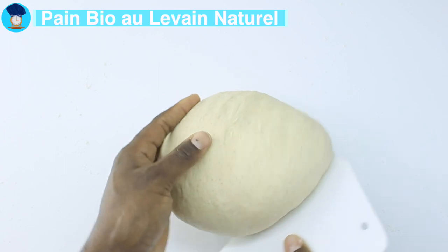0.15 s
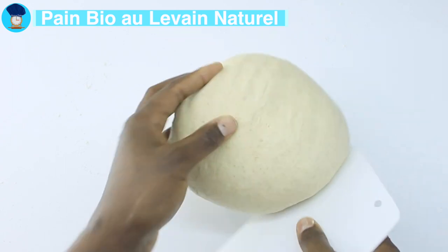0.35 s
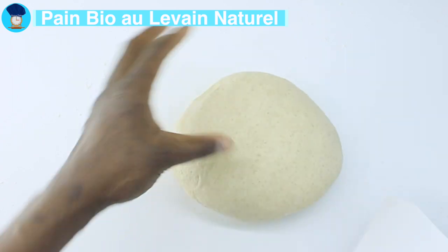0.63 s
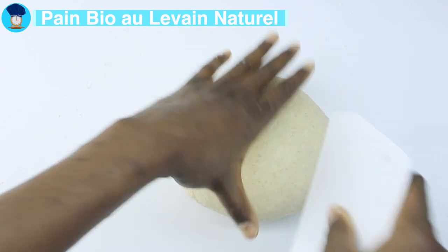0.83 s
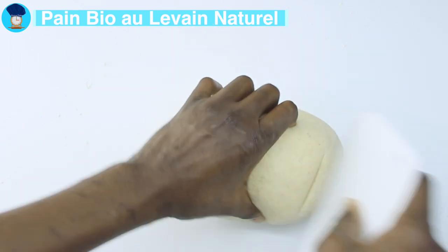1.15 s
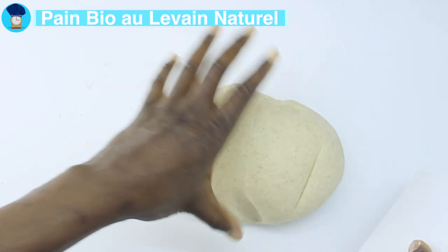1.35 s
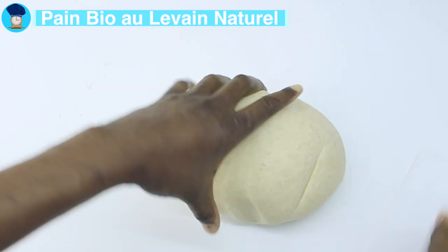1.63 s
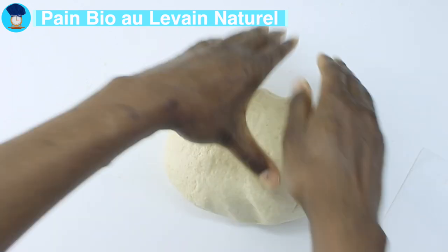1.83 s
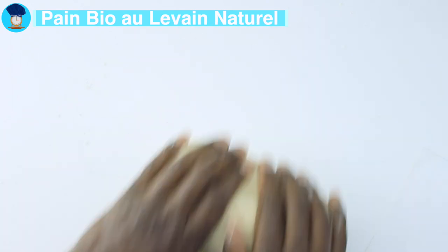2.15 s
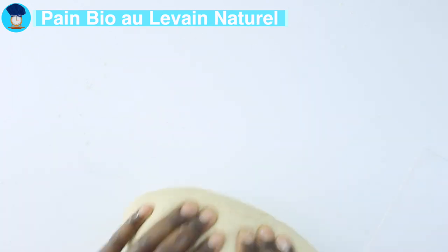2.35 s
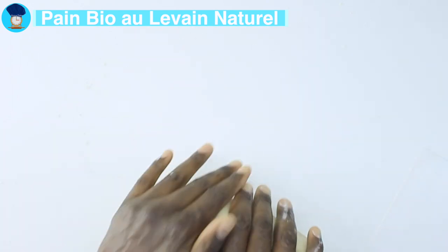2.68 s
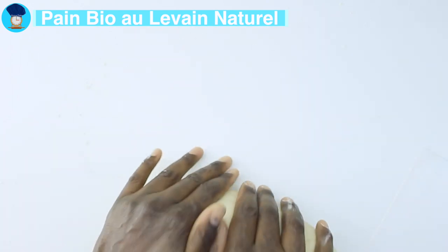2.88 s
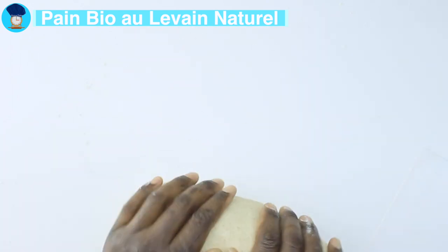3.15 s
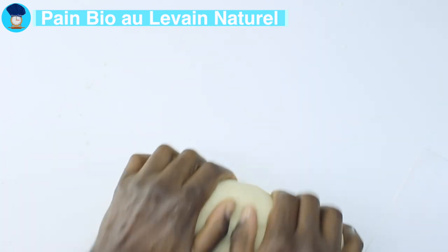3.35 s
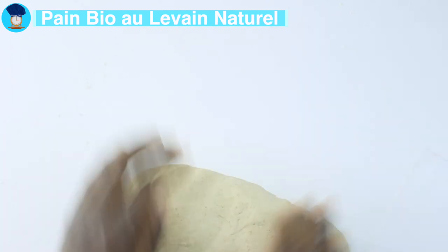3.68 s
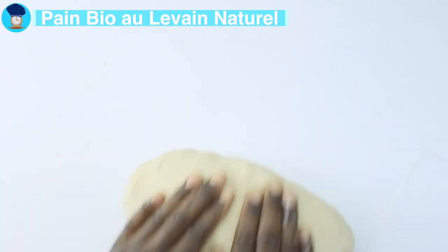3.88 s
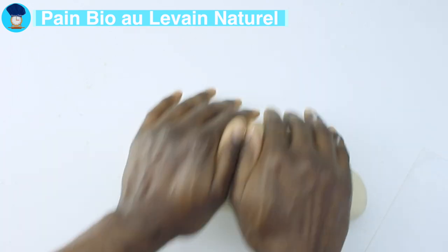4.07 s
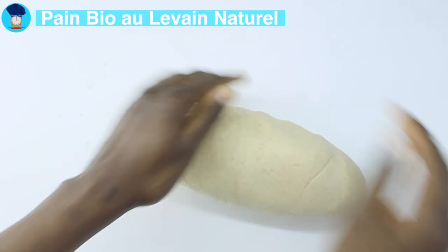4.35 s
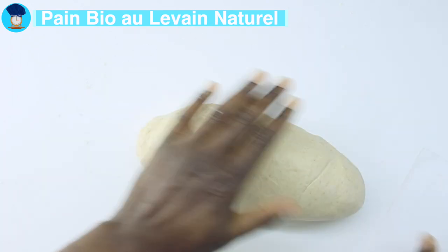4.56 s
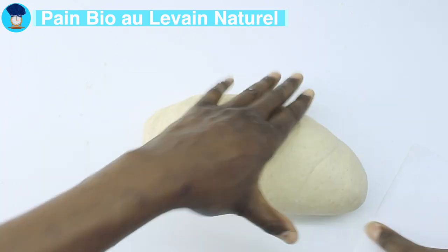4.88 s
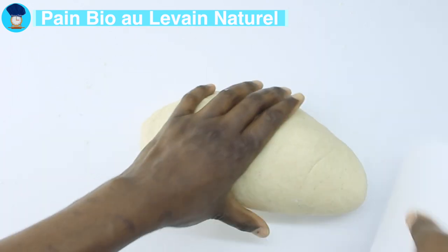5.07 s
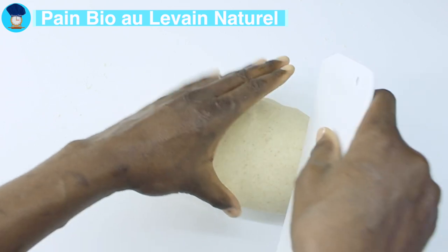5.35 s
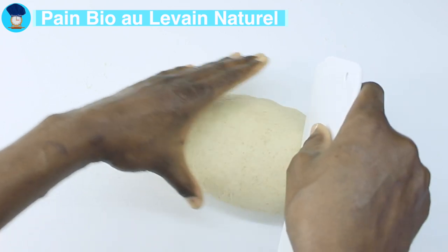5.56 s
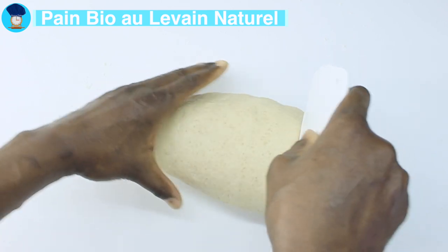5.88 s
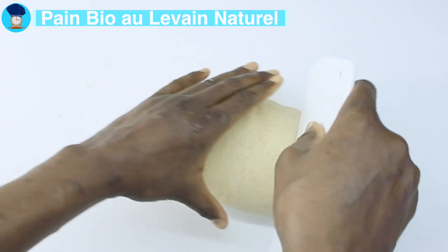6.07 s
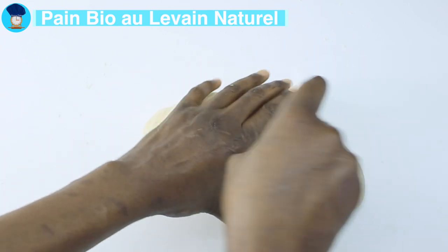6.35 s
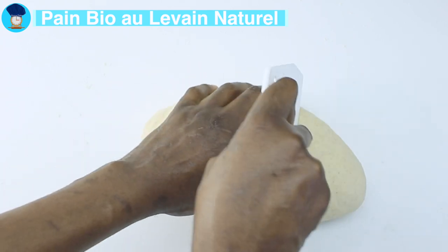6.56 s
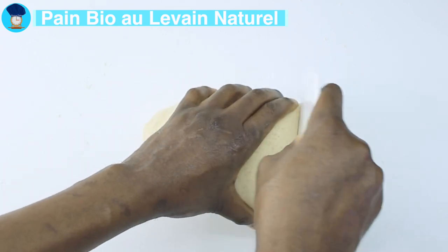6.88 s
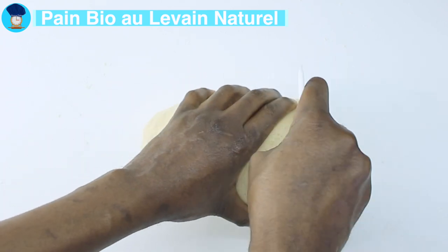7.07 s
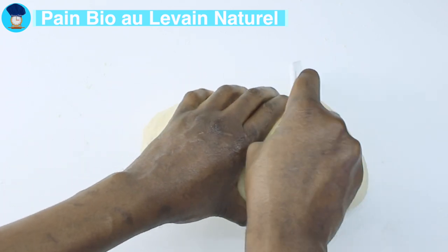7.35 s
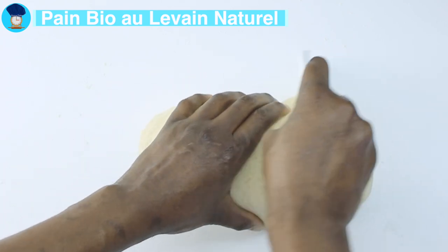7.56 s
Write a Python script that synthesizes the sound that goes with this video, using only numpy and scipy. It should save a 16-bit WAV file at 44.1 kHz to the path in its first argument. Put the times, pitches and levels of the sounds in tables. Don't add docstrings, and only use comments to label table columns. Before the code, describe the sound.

Hands press, drag and roll bread dough on a kitchen worktop with soft rubs, irregular thumps and sharp knocks over a faint fridge hum.

```python
import sys
import numpy as np
from scipy import signal
from scipy.fft import rfft, irfft, next_fast_len
from scipy.io import wavfile
from scipy.ndimage import uniform_filter1d, map_coordinates

SR = 44100
rng = np.random.default_rng(int(sys.argv[2]) if len(sys.argv) > 2 else 0)


def linear_from_db(decibels):
    return 10 ** (np.asarray(decibels, float) / 20)


def wav_record(signal):
    frames = np.transpose(np.atleast_2d(signal))
    bounded = np.clip(frames, -1, 1)
    quanta = np.round(bounded * 32767).astype(np.int16)
    wavfile.write(sys.argv[1], SR, quanta)


N = 340452

# [t/s, easing per 20 dB/s, rub level/dB, rumble over rub/dB, hiss over rub/dB]
PRESSES = [(0.01, 0.0951, -26, -12, -9), (.3, 1.1, -54.5, 4, -8), (.76, 0.1, -57, 14, -11),
           (.984, 0.15, -55, 9.5, -17), (1.11, 0.26, -57.5, 10, -1.5), (1.682, -0.1, -51, -4, -7),
           (2.015, 0.22, -53, 15.5, -9), (2.84, .25, -55.5, 2, -4), (3.3, 1.5, -55, -1, -6),
           (4.105, 0.24, -50, 9, -5.5), (4.47, 1, -59, 7, -7), (2.27, 0.3, -58.5, 5, -4),
           (4.9, 0.3, -50.5, 4.5, -4.5), (5.22, 0.37, -58.5, 6, -4.5), (5.33, 0.2, -55, 4.5, -9),
           (7.16, 0.05, -52.5, -1, -18), (7.57, -0.1, -61, 15, -11)]
# [lift t/s, swelling per 20 dB/s, rub level/dB, rumble over rub/dB, hiss over rub/dB]
DRAGS = [
    (1.347, 0.11, -48, 9, 3),
    (1.535, 0.65, -54, 2, -13),
    (1.72, 0.13, -53.5, 13, -25),
    (2.236, 0.37, -42.5, 2, -6),
    (2.581, 0.07, -44.5, 2.5, -6.5),
    (3.566, 0.11, -38.5, -1, -4.5),
    (5.015, 0.26, -51, -2, -7),
    (7.71, 0.25, -45.5, 1, -10.5),
]
# [start t/s, hold/s, rub level/dB, rumble over rub/dB, hiss over rub/dB]
ROLLS = [
    (0.154, 0.15, -51, 6.5, -5.5),
    (2.103, 0.11, -56, -2, 3.5),
    (3.025, 0.093, -49, -0.5, -7.5),
    (0.036, 0.064, -41.5, -2.5, -4),
    (3.473, 0.039, -49, 10.5, -19),
    (3.965, 0.1, -56.5, 5.5, -3.5),
    (4.335, 0.1, -46.5, 0, -10),
    (7.62, .15, -49.5, 4, -9.5),
]
# [f/Hz, level per Hz/dB]
RUMBLE_SPECTRUM = [(24, -44), (40, -31), (65, -9.5), (160, -1), (235, -11), (329, -2.5), (362, -7),
                   (519, -20), (700, -20), (910, -46), (1540, -120)]
# [f/Hz, level per Hz/dB]
RUB_SPECTRUM = [(210, -41), (350, -14.5), (607, -10), (922, -2.5), (1340, -6), (1630, -5.5), (2500, -10),
                (4000, -12), (5200, -21.5), (8800, -120)]
# [f/Hz, level per Hz/dB]
FLOUR_SPECTRUM = [(1470, -37), (2500, -9.5), (4170, -2.5), (4760, -4.5), (7250, -5), (13800, -16.5),
                  (16000, -30)]
# [f/Hz, likeness]
NEAR_ALIKE = [(60, 0.82), (180, 0.96), (550, 1), (1650, 0.77), (4970, 0.53), (15000, -0.15)]


def strokes():
    # time, rise s per 20 dB, hold s, fall s per 20 dB, then its levels
    moves = [(s, 0.028, 0, ease, *mix) for s, ease, *mix in PRESSES]
    moves += [(s, swell, 0, 0.067, *mix) for s, swell, *mix in DRAGS]
    moves += [(s, 0.042, hold, 0.072, *mix) for s, hold, *mix in ROLLS]
    t = np.arange(N) / SR
    power = np.zeros((3, N))
    for s, rise, hold, fall, db, weight_db, flour_db in moves:
        near = slice(max(round((s - 3 * rise) * SR), 0), round((s + hold + 3 * fall) * SR))
        before, after = (s - t[near]) / rise, (t[near] - s - hold) / fall
        below_db = 20 * np.maximum(0, np.maximum(before, after))
        power[:, near] += linear_from_db(db - below_db + np.array([[weight_db], [0], [flour_db]])) ** 2
    gains = np.sqrt(power)
    slip = wobble(45)
    rumble = unit(linear_from_db(1.5 * wobble(30) + 0.7 * slip) * rush(RUMBLE_SPECTRUM, NEAR_ALIKE, patchy_db=3.0))
    rub = unit(linear_from_db(1.5 * slip + 0.73 * wobble(250)) * rush(RUB_SPECTRUM, NEAR_ALIKE, patchy_db=2.1))
    hiss = unit(linear_from_db(0.5 * slip + 1.2 * wobble(600)) * rush(FLOUR_SPECTRUM, NEAR_ALIKE, patchy_db=2.5))
    return gains[0] * rumble + gains[1] * rub + gains[2] * hiss


# [t/s, peak level/dB, brightness/dB, body f/Hz, body level/dB]
TAPS = [(0.3013, -32.5, -26, 1490, 4), (1.2235, -47, -6, 640, 4), (1.5531, -18.5, -6, 1250, -1),
        (1.615, -21, -9, 960, 13), (1.7396, -3.5, 4, 2240, 2), (1.7445, -4.5, -0.5, 1125, 8),
        (.973, -37.5, -5, 3200, 2), (1.08, -40.5, -7, 1860, 11), (2.044, -39, -4.5, 1900, 16),
        (2.5757, -32, -8, 2500, 1), (2.7374, -16.5, -10, 1660, 9), (3.209, -19.5, -4, 2210, 10.5),
        (5.098, -25, 2, 2150, 7), (5.1023, -9.5, -2, 2140, 5), (5.104, -17, 0, 4360, 16),
        (5.3742, -38.5, -5, 2840, 11), (6.44, -42, -8, 2180, 5), (7.5276, -31.5, -22, 600, 17)]
# [t/s, peak level/dB, brightness/dB, body f/Hz, body level/dB]
PATS = [(.5229, -11.5, -3.5, 907, 0.5), (1.61, -24.5, -7, 850, 10), (1.742, -8, 3.5, 2490, 14),
        (1.7465, -4.5, -0.5, 1775, 15.5), (2.713, -35, -9, 1640, 6), (2.724, -32, -3.5, 1100, 3),
        (2.73, -27.5, -7.5, 1650, 9), (3.204, -28.5, -7.5, 2060, -1), (3.539, -33, -12, 842, 3),
        (3.551, -29.5, -3, 700, 8), (4.7139, -20.5, 0, 2230, 6), (4.886, -33, -1, 1220, 26),
        (5.026, -31, -.5, 1060, 20), (5.031, -16.5, 1, 1150, 30), (5.038, -18.5, -1.5, 1190, 22),
        (5.046, -21.5, -2, 970, 15.5), (5.158, -28.5, -10, 990, 6), (7.15, -46, 5.5, 3700, 15)]
# [f/Hz, level per Hz/dB]
SLAP_SPECTRUM = [(120, -21), (200, -4), (273, -10.5), (373, -4.5), (1060, -4.5), (1370, -6.5), (1740, -8.5),
                 (3070, -8.5), (3370, -5.5), (10500, -17.5), (16000, -32)]


def slaps():
    track = np.zeros((2, N))
    t = np.arange(SR // 2) / SR
    tap_s, pat_s = 0.0023, 0.0048
    blows = [(*row, tap_s) for row in TAPS] + [(*row, pat_s) for row in PATS]
    for s, db, bright_db, body_hz, body_db, contact in blows:
        def tilt(f):
            return linear_from_db(along(SLAP_SPECTRUM, f) + bright_db * np.clip(np.log2((f + 1) / 1700), -0.3, 1.3))

        def colour(f):
            return tilt(f) * (1 + linear_from_db(body_db) * resonance(f, body_hz, 0.094 * body_hz))

        def room_colour(f):
            walls = 1 / np.sqrt(1 + (f / 9000) ** 2)
            return tilt(f) ** 0.18 * np.abs(colour(f)) ** 0.81 * linear_from_db(0.082 * body_db) * walls

        crack = even(rng.standard_normal((2, len(t))) * np.exp(-t / contact))
        crack *= np.exp(-t / (4 * contact)) * [[1], [0.7]]
        crack *= 1 - np.exp(-t / (0.061 * contact))
        echo = tail(len(t))
        echo = echo / np.sqrt(np.mean(echo[:, :400] ** 2)) * (1 - np.exp(-t / 0.003))
        echo *= linear_from_db(-12) * np.sqrt(contact / 0.0039)
        blow = filtered(crack, colour) + filtered(echo, room_colour)
        size = np.sqrt(np.mean(np.abs(colour(np.linspace(50, SR / 2, num=400))) ** 2))
        add(track, s, linear_from_db(db - 0.5) / size * blow)
    return stereo(track, NEAR_ALIKE)


def even(x):
    z = rfft(x)
    power = np.abs(z) ** 2
    coarse = uniform_filter1d(power, size=150) / np.mean(power)
    return irfft(z / np.sqrt(coarse + 0.021), x.shape[-1])


# [t/s, peak level/dB, push f/Hz, ring t60/s, deep boom level/dB]
THUMPS = [(.238, -33, 150, 0.08, -14), (0.304, -30.5, 161, 0.14, -12), (.5228, -4, 188, .16, -11),
          (0.978, -39, 205, 0.2, -17), (1.312, -31.5, 158, 0.14, -6), (1.552, -29.5, 180, .18, -12),
          (1.746, -18, 425, 0.1, -13.5), (1.996, -27.5, 202, 0.24, -3.5), (2.155, -31.5, 173, 0.85, -10),
          (2.7371, -27.5, 272, 0.14, -5.5), (3.088, -35, 322, 0.41, -18), (3.208, -25.5, 282, .16, -8.5),
          (3.539, -35, 291, 0.39, -11), (4.332, -33, 148, 0.27, -26), (4.7135, -30.5, 250, 0.18, -3),
          (5.1, -14, 287, 0.064, -11), (5.1124, -13.5, 141, 0.14, -30), (6.172, -44, 100, .1, -15),
          (7.528, -32, 150, 0.19, -2.5), (7.53, -36.5, 308, 0.21, -20), (2.185, -36, 200, .12, -10),
          (4.832, -36, 150, 0.096, -12)]
# [f/Hz, level/dB, t60/s]
WORKTOP = [(148, 1, 0.12), (126.6, -4, 0.14), (180, 7.5, 0.049), (209, -6.5, 0.092), (260.5, -6.5, .08),
           (324.2, -2.5, 0.12), (429.6, -2, 0.077), (467.5, -12, 0.11), (605, -8, 0.047)]
# [f/Hz, level/dB, t60/s]
CUPBOARD = [(64.2, 2, 0.14), (83.8, 8, 0.19), (105.5, -9, 0.53)]


def thumps():
    track = np.zeros((2, N))
    t = np.arange(SR // 2) / SR
    for s, db, push_hz, ring_t60, deep_db in THUMPS:
        narrow_db = 8 * (push_hz / 200) ** 3.2
        top = ringing(WORKTOP, t, lambda hz: -narrow_db * np.log2(hz / push_hz) ** 2, ring_t60 / 0.23)
        deep = ringing(CUPBOARD, t, lambda hz: 0, ring_t60 / 0.19)
        boom = top + linear_from_db(deep_db) * deep
        wet = signal.fftconvolve(boom[None, :2000], tail(len(t)), axes=1)[:, :len(t)]
        add(track, s, linear_from_db(db) * (boom + linear_from_db(-12.5) * wet))
    return track


def ringing(modes, t, lean_db, life):
    ring = np.zeros(len(t))
    for hz, db, t60 in modes:
        level_db = db + lean_db(hz) + rng.normal(0, 0.69) - 60 * t / (t60 * life)
        ring += linear_from_db(level_db) * np.sin(2 * np.pi * hz * t)
    ring = ring * (1 - np.exp(-t / 0.011))
    return ring / np.abs(ring).max()


# [f/Hz, t60/s]
KITCHEN = [(100, 0.35), (500, 0.29), (2000, 0.22), (6000, 0.23), (9500, 0.21), (14000, 0.15)]


def tail(length):
    hz, t, z = signal.stft(rng.standard_normal((2, length)), SR, nperseg=256)
    decay = linear_from_db(-60 * t / along(KITCHEN, hz)[:, None])
    echo = signal.istft(z * decay, SR, nperseg=256)[1][:, :length]
    return echo / np.linalg.norm(echo[0])


# [f/Hz, rms level/dB]
HUM = [(48.4, -55.5), (145.3, -62.5), (296.1, -68.5), (613.7, -64.5), (640.6, -73.5), (689.1, -68.5),
       (737.5, -68)]
# [middle t/s, half length/s, rise/dB]
SWELLS = [(0.427, .11, 9), (0.998, 0.092, 4), (1.307, 0.1, 10), (1.9, .15, 9), (2.977, .09, 9.5),
          (3.45, .12, 3), (4.033, 0.23, 15), (4.577, .08, 2), (5.005, 0.12, 14), (5.79, 0.13, 5.5),
          (6.033, 0.16, 11.5), (7.002, 0.091, 12)]
# [f/Hz, rms level/dB]
UPPER = [(3106, -80), (3160, -80), (3208, -78.5), (3257, -78), (4242, -84), (4587, -81)]
# [f/Hz, width/Hz, level/dB]
PIPES = [(3073, 163, 1), (3237, 190, -1.5), (4370, 540, -3.5), (4550, 28, 3)]
# [f/Hz, level per Hz/dB]
AIR_SPECTRUM = [(40, -38.5), (70, -23), (100, -2), (152, -16), (180, -13), (300, -8.5), (462, -11.5),
                (620, -9.5), (680, -18), (815, -8.5), (1410, -18), (2500, -25.5), (8000, -31.5),
                (16000, -41.5)]
# [f/Hz, likeness]
FAR_ALIKE = [(60, 0.46), (180, 0.51), (550, 0.77), (1650, 0.094), (4970, 0.000012), (15000, -0.21)]


def fridge():
    t = np.arange(N) / SR
    shaft_hz, whine_hz = 48.54, 3033.5
    hum = np.zeros(N)
    for k, (hz, db) in enumerate(HUM):
        level_db = db + 3.3 * wobble(6.7) * (k > 0)
        hum += np.sqrt(2) * linear_from_db(level_db) * np.sin(2 * np.pi * hz * t + 0.73 * k * wobble(3.7))

    swell_db = sum(db * np.exp(-((t - s) / half) ** 4) for s, half, db in SWELLS)
    whine_db = -73 + 1.5 * wobble(14) + swell_db
    beat = np.cos(np.pi * shaft_hz * (t - 3.985))
    drift = 0.7 * wobble(14) + 0.25 * wobble(2.04) * [[1], [-1]]
    whine = 2 * linear_from_db(whine_db) * beat * np.sin(2 * np.pi * whine_hz * t + drift)

    upper = np.zeros(N)
    for hz, db in UPPER:
        level_db = db + 2.0 * wobble(4) + 0.37 * (whine_db + 66.5)
        upper += np.sqrt(2) * linear_from_db(level_db) * np.sin(2 * np.pi * hz * t + 0.92 * wobble(16))

    def pipe_ring(f):
        return sum(linear_from_db(db) * resonance(f, hz, width) ** 2 for hz, width, db in PIPES)

    pipes_db = -65.5 + 0.234 * (whine_db + 69) + 3.4 * wobble(2.51)
    pipes = linear_from_db(pipes_db) * unit(filtered(rng.standard_normal((2, N)), pipe_ring))
    air = linear_from_db(-51 + 0.53 * wobble(2.92)) * rush(AIR_SPECTRUM, FAR_ALIKE, patchy_db=1.44)
    return hum + whine + upper + pipes + air


def rush(spectrum, alike, patchy_db):
    z = signal.stft(rng.standard_normal((2, N)), nperseg=512)[2]
    field = uniform_filter1d(rng.standard_normal(z.shape[1:]), size=5, axis=0)
    field = uniform_filter1d(field, size=5, axis=1)
    pair = signal.istft(z * linear_from_db(patchy_db * unit(field)), nperseg=512)[1][:, :N]
    coloured = filtered(pair, lambda hz: linear_from_db(along(spectrum, hz)))
    return unit(stereo(coloured, alike))


def stereo(pair, alike):
    def shares(hz):
        turn = np.arccos(np.clip(along(alike, hz), -1, 1)) / 2
        return np.array([np.cos(turn), np.sin(turn)])

    mid, side = filtered(pair, shares)
    return np.array([mid + side, mid - side])


def filtered(x, response):
    n = x.shape[-1]
    m = next_fast_len(n + 8192)
    return irfft(rfft(x, m) * response(np.fft.rfftfreq(m, 1 / SR)), m)[..., :n]


def resonance(f, hz, width_hz):
    return 1j * f * width_hz / (hz * hz - f * f + 1j * f * width_hz + 1e-9)


def wobble(rate):
    knots = rng.standard_normal(int(N * rate / SR) + 4)
    return map_coordinates(knots, [np.arange(N) * rate / SR])


def along(points, hz):
    f, v = np.transpose(points)
    return np.interp(np.log(hz + 1), np.log(f + 1), v)


def unit(x):
    return x / np.sqrt(np.mean(x ** 2) + 1e-20)


def add(track, s, sound):
    part = track[:, round(s * SR):][:, :sound.shape[-1]]
    part += sound[..., :part.shape[-1]]


def scene():
    return strokes() + slaps() + thumps() + fridge()


def roll_off(x):
    return signal.sosfilt(signal.butter(12, 16480, fs=SR, output="sos"), x)


# [f/Hz, left minus right level/dB]
MIC_LEAN = [(60, -4.0), (180, -2.5), (550, -2.0), (1650, -1), (4970, -0.5), (15000, -0.5)]


def record(dry):
    def microphones(hz):
        cut = (1j * hz / (24 + 1j * hz)) ** 4 * (hz < 15900)
        return cut * linear_from_db(np.outer([0.5, -0.5], along(MIC_LEAN, hz)))

    mix = np.clip(filtered(dry, microphones), -1, 1)
    return roll_off(mix)


dry = scene()
out = record(dry)
wav_record(out)
```